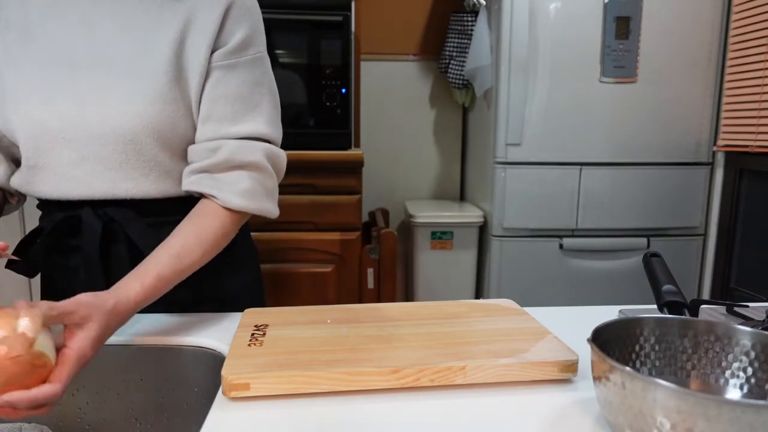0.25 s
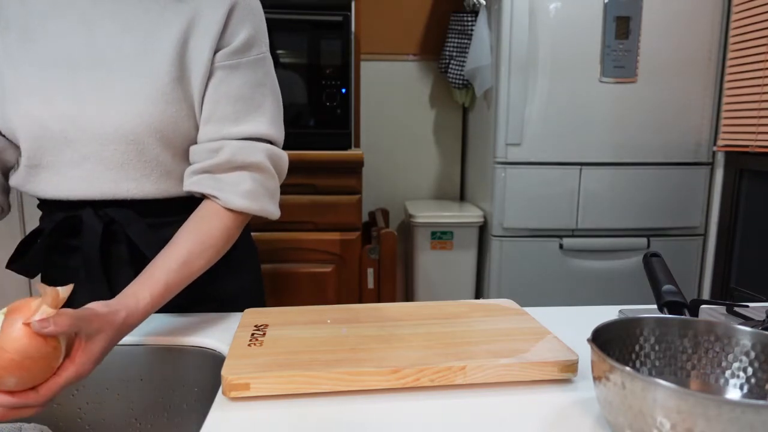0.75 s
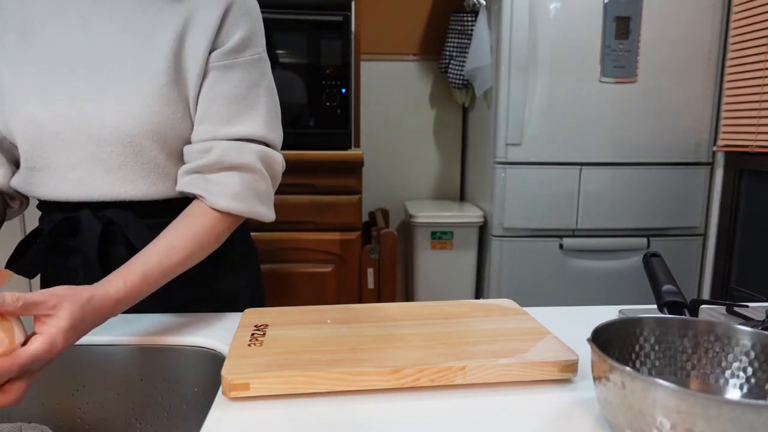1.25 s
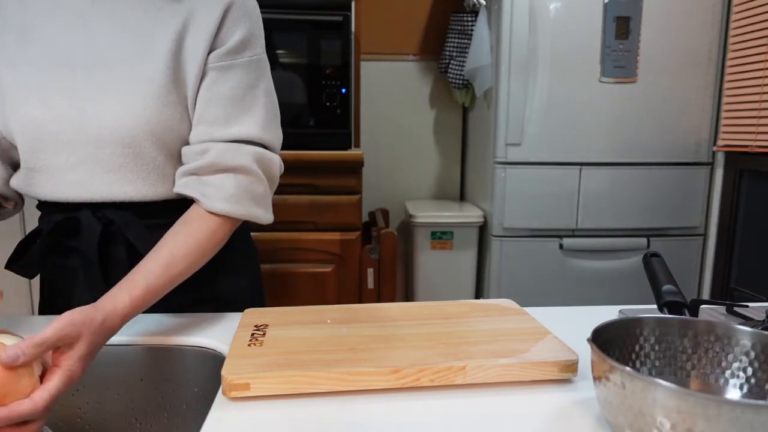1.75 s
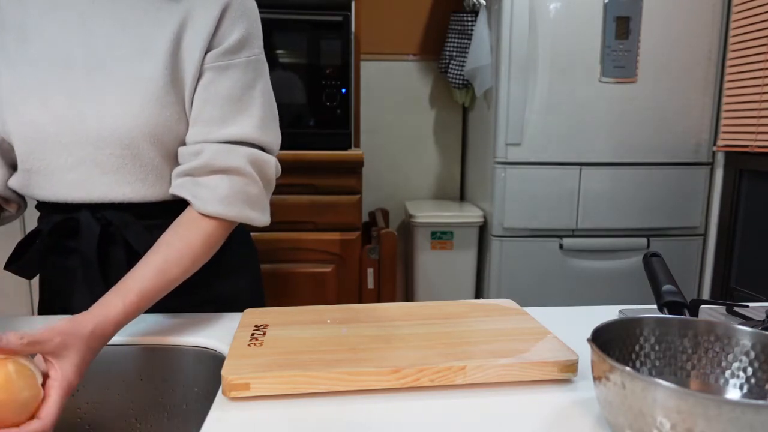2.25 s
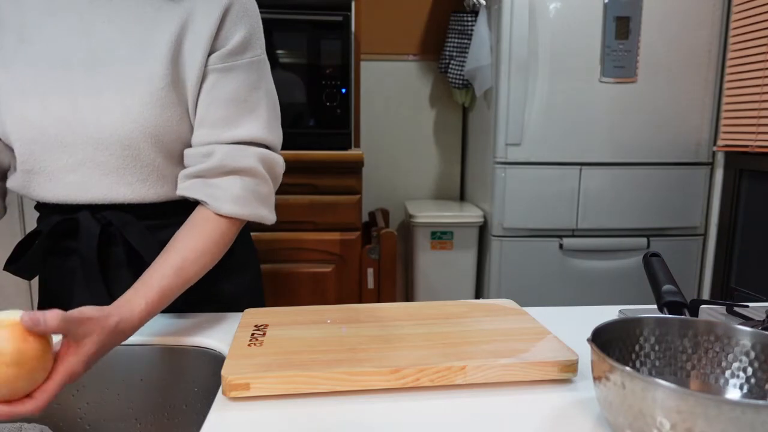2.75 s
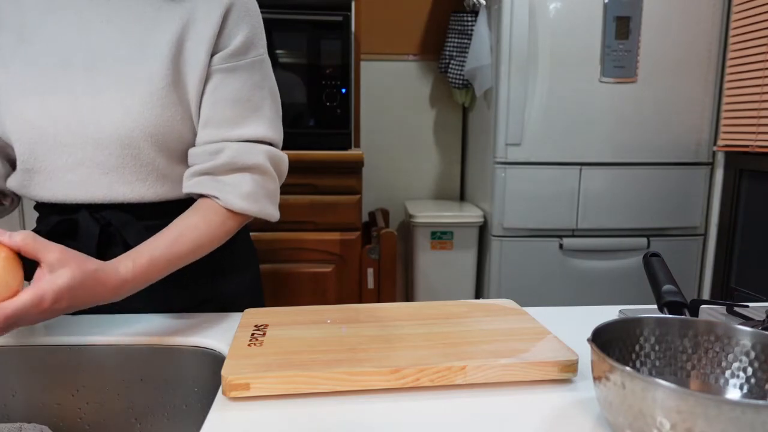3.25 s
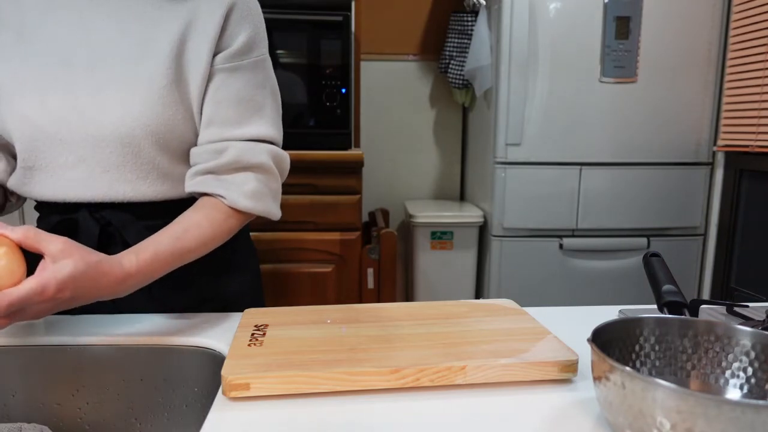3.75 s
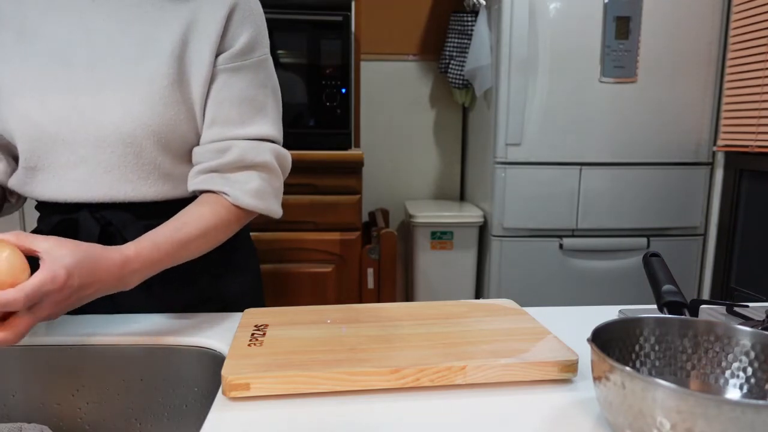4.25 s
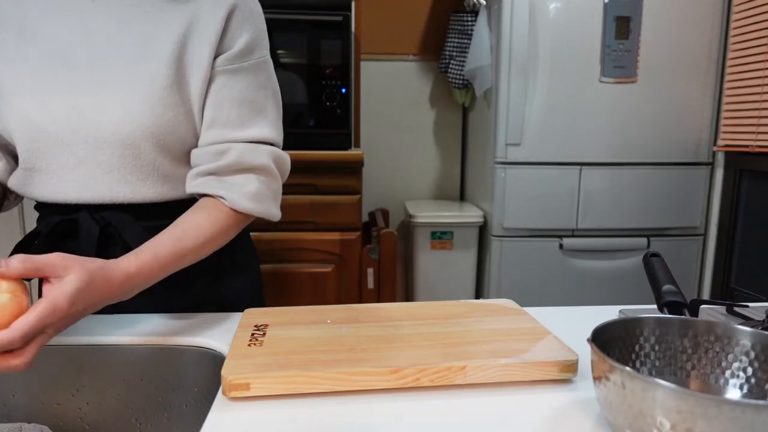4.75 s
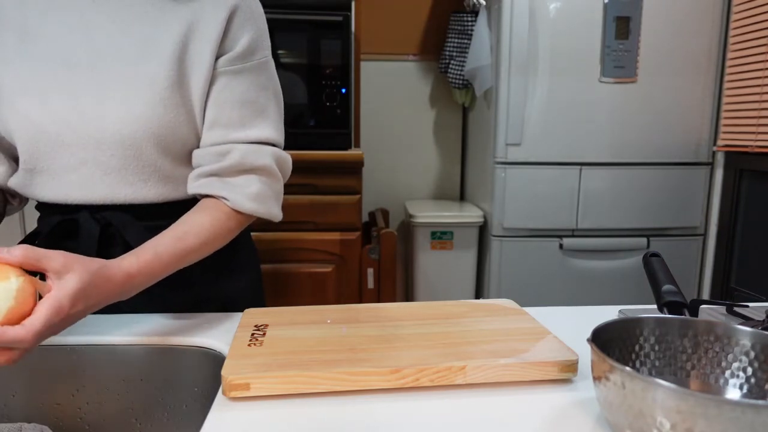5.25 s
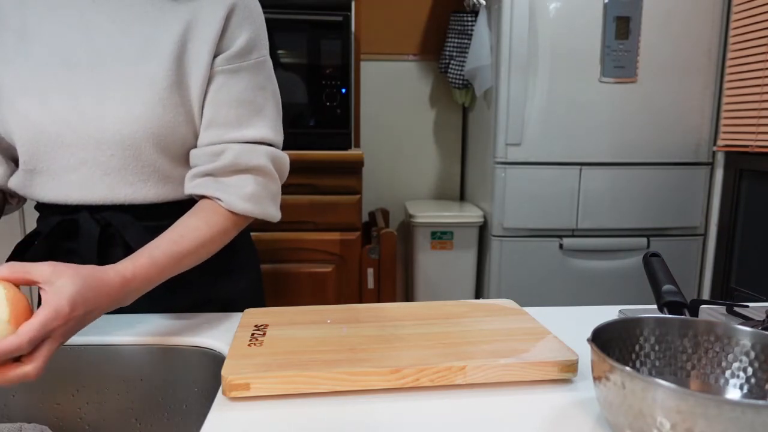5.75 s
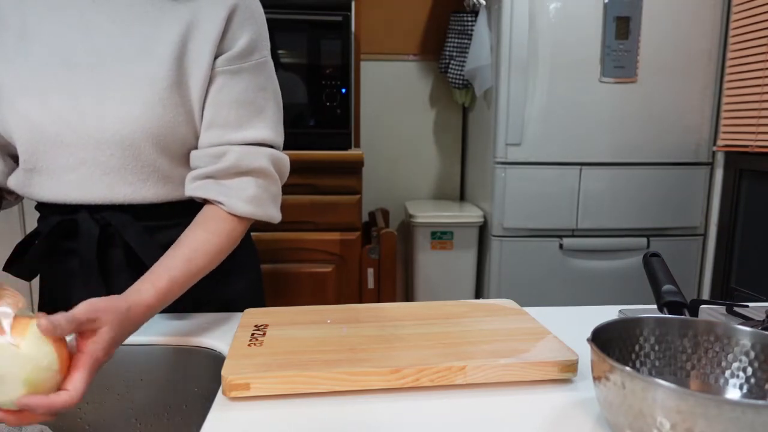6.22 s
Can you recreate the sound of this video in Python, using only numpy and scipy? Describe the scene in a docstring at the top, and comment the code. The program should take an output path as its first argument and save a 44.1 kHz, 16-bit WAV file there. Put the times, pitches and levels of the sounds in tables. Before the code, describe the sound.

Someone peels papery skin off an onion in crisp, crackling bursts, with light blade rubs, soft knocks and a low appliance rumble.

```python
"""Peeling a dry onion

Papery skin is pulled off beside a steel sink in a small kitchen, just left of centre. It tears in
streams of tiny snaps and breaks in sharper cracks, with brief, fuzzy notes among them. A knife blade
rings faintly as it rubs, and fingers knock dully on the onion. A low appliance rumble fills the room,
with a faint whine and a few thin whistles above it."""
import sys
import numpy as np
from scipy import signal
from scipy.io import wavfile
from scipy.ndimage import uniform_filter1d

SR = 44100
rng = np.random.default_rng(int(sys.argv[2]) if len(sys.argv) > 2 else 0)


def unload_audio(sound):
    """Save the sound as a 16-bit wav file, at the path given as the first command line argument."""
    columns = np.transpose(np.atleast_2d(sound))
    # keep every value between -1 and 1, then stretch to whole-number steps
    steps = np.round(np.clip(columns, -1, 1) * 32767)
    wavfile.write(sys.argv[1], SR, steps.astype(np.int16))


N = 285768

# Pulls that tear the skin: full_at_s, rise_s, hold_s, level_db, decay_db_per_s, flap_db, crisp_db
PULLS = [(.001, 0.0013, 0.11, -45, 200, -10.5, 8.5), (0.086, .003, 0.022, -32, 201, -10, 1),
         (.125, 0.046, 0.084, -25.5, 600, -6, 0), (.215, .01, .005, -34.5, 150, -7, -6),
         (0.265, .002, .008, -35, 300, -7.5, -1), (0.276, .006, 0.034, -29, 330, -12.5, -3.5),
         (0.347, .01, 0.017, -45.5, 93, -9, -5.5), (.454, .002, .001, -39, 230, -11.5, -20),
         (0.517, 0.0065, .001, -43, 500, -7, -3), (0.542, .01, .001, -55.5, 106, -20, -8),
         (0.734, .002, .001, -45, 269, -10, 3), (0.709, .03, .01, -61.5, 200, -5, 3),
         (0.844, .05, 0.1, -68.5, 200, -18, -6), (1.031, 0.064, .001, -47, 93, -13.5, -28),
         (1.176, 0.099, .001, -38, 198, -8.5, -17), (1.231, 0.0037, .001, -28.5, 318, -9, -9),
         (1.347, .01, 0.043, -25.5, 288, -10.5, -14.5), (1.461, 0.024, 0.034, -22.5, 263, -12.5, -7.5),
         (1.577, .02, 0.018, -54, 90, -13, -28), (1.835, .23, 0.049, -44, 350, -14.5, -12),
         (2.02, 0.12, .001, -47.5, 500, -15, -15), (2.026, 0.0036, .001, -28.5, 500, -22, -26),
         (2.042, .014, .001, -36.5, 130, -12, -18), (2.109, .005, .001, -27.5, 143, -13, -10),
         (2.194, .005, .003, -29.5, 196.5, -9.5, -7), (2.247, 0.018, 0.014, -27, 300, -5.5, -1),
         (2.287, .03, .005, -30, 140, -9.5, -1.5), (2.371, 0.0073, .001, -25.5, 290, -9, -3),
         (2.436, 0.0091, .001, -26, 348.5, -8.5, -9), (2.516, 0.018, .001, -37, 199, -3, -2),
         (2.653, 0.0044, .001, -40, 236, -15, -4.5), (2.731, 0.033, .001, -37.5, 321.5, -5.5, -5),
         (2.776, .015, .001, -40.5, 264.5, -4, -3.5), (3.827, 0.024, .001, -48.5, 203, -1, 6),
         (3.936, 0.039, .001, -54.5, 150, -3.5, 2), (4.216, 0.17, .001, -40, 87, -8.5, 3.5),
         (4.304, .003, 0.027, -36, 202, -11, 0), (4.347, 0.061, .02, -28, 358, -11, -4),
         (4.436, .01, 0.045, -53, 103, -20, -5), (4.52, 0.029, .001, -44, 275, -1, 5),
         (4.575, .004, .001, -46, 1505, -4, 10), (4.597, .001, .014, -36.5, 196, -20, -1),
         (4.699, 0.065, 0.15, -31, 353, -9, -6), (4.913, .03, 0.19, -58, 497, -7.5, -7.5),
         (5.15, .04, 0.095, -69.5, 195, -12, -4), (5.649, 0.037, 0.083, -29, 300, -23, -10),
         (5.794, .01, .001, -51, 150, -5, 0), (5.864, .002, .005, -52, 298, -5, 17.5),
         (5.9116, 0.00076, 0.0026, -18.5, 1200, -14.5, -5.5), (5.923, .008, .02, -31.5, 298, -4, -7),
         (5.967, 0.049, 0.021, -25.5, 390, -9, -4), (6.056, .01, 0.093, -45.5, 200, -0.5, 0),
         (6.175, 0.026, .001, -38, 324, -2.5, -6), (6.252, .01, .001, -65.5, 28, 1, 0)]
# Tone colour of dry skin: frequency_hz, level_db
SKIN_SPECTRUM = [(240, -30), (400, -36), (598, -37.5), (839, -16.5), (1290, -14), (1990, -7.5),
                 (3210, -3.5), (3690, 1.5), (4510, 1), (4950, 2.5), (10500, 3.5), (15000, -2), (16000, -8)]
# Long rips that free a flap: full_at_s, pitch_at_full_hz, fall_octaves_per_s, level_db
LONG_RIPS = [(.13, 2160, 7, -36), (4.35, 2350, 4.5, -29.5), (4.82, 1480, 5.5, -44),
             (5.674, 2760, 13.4, -31)]
# Sharp breaks in the skin: start_s, level_db, pitch_hz
SKIN_CRACKS = [(.0548, -22, 10200), (0.087, -10.5, 9180), (0.109, -7.5, 9200), (0.1468, -3, 6500),
               (.165, -10, 3680), (.175, -6, 10500), (0.1988, -4, 7100), (.263, -19, 5980),
               (0.279, -5.5, 5650), (.304, -14, 6040), (0.3297, -16.5, 5000), (.415, -27.5, 3650),
               (0.455, -16, 6140), (0.5177, -26, 4470), (0.5748, -33, 4200), (0.601, -30.5, 4330),
               (.737, -25, 6160), (1.0156, -31, 5740), (1.065, -28, 6730), (1.1232, -19.5, 5960),
               (1.1463, -11, 3400), (1.1713, -15.5, 10100), (1.231, -12, 6940), (1.3467, -9.5, 10200),
               (1.353, -12, 5610), (1.455, -6, 3460), (1.4584, -5.5, 3650), (1.504, -6, 5800),
               (1.5752, -22, 4100), (1.713, -27.5, 6760), (1.9877, -28, 4720), (2.027, -10, 6300),
               (2.106, -11, 6700), (2.1961, -12.5, 6200), (2.2469, -11, 4500), (2.268, -17, 6000),
               (2.2905, -6, 6350), (2.328, -11, 10700), (2.375, -8.5, 7200), (2.4375, -12, 8900),
               (2.5145, -18, 6200), (2.5596, -24, 7750), (2.654, -25, 5800), (2.722, -19, 6000),
               (2.7777, -30, 3540), (2.828, -33.5, 8500), (3.4252, -31.5, 8800), (3.669, -44, 11200),
               (3.822, -28, 11500), (3.9327, -36, 11700), (4.0884, -36, 3700), (4.1105, -23.5, 9200),
               (4.1465, -21, 8880), (4.172, -19, 8700), (4.1859, -24, 7600), (4.2163, -24, 6940),
               (4.308, -16.5, 9920), (4.321, -14.5, 3900), (4.4566, -28.5, 8530), (4.4882, -33, 8270),
               (4.5089, -25, 7400), (4.519, -40, 7800), (4.573, -18, 8800), (4.5991, -10, 9600),
               (4.612, -14, 8000), (4.6698, -22, 5300), (4.6818, -25, 5140), (4.9544, -35, 6360),
               (5.055, -30.5, 6300), (5.093, -42, 5120), (5.1577, -41, 3740), (5.2867, -39, 8750),
               (5.308, -37.5, 3760), (5.3258, -36, 8900), (5.3368, -25.5, 8900), (5.3997, -25, 9500),
               (5.4183, -21, 8000), (5.5565, -31, 9200), (5.642, -17, 6580), (5.6488, -14, 6000),
               (5.8097, -36, 5200), (5.8625, -21, 10500), (5.914, -18, 3940), (5.955, -10.5, 4100),
               (6.072, -23, 3340), (6.1389, -26, 8880), (6.169, -19.5, 3740), (6.1757, -19, 6340),
               (6.1834, -17, 10500), (6.3684, -35.5, 11200)]
# Brief, fuzzy ringing notes heard during the tearing: start_s, end_s, pitch_hz, level_db
FUZZY_NOTES = [(.147, .16, 6300, -25), (1.346, 1.425, 3060, -31.5), (1.446, 1.492, 3680, -20),
               (1.752, 1.93, 3730, -44.5), (2.24, 2.3, 4300, -28), (4.106, 4.25, 8700, -44.5),
               (4.316, 4.357, 3830, -29.5), (4.327, 4.398, 7470, -27.5), (4.695, 4.86, 5030, -30),
               (4.699, 4.87, 3900, -39), (5.652, 5.682, 5800, -31), (5.683, 5.753, 7600, -31),
               (5.918, 6.007, 3850, -24), (6.058, 6.19, 3520, -44), (6.056, 6.2, 2470, -48.5)]
# Knife strokes on the onion: full_at_s, rise_s, hold_s, level_db, decay_db_per_s, tilt_db_per_octave
KNIFE_STROKES = [(3.246, 0.037, .001, -48.5, 595, -3), (3.275, 0.021, .14, -60.5, 197.5, 8),
                 (3.427, 0.021, .001, -44, 236, 5.5), (3.687, 0.017, .001, -48, 365, -2.5),
                 (3.828, 0.017, 0.00094, -40, 292, -3), (3.93, 0.032, .04, -56, 398, 1),
                 (4.11, .01, 0.1, -41.5, 202, 0), (5.346, .075, .001, -40, 318, -2),
                 (5.429, 0.05, .001, -26.5, 320, -1.5), (5.56, 0.066, .001, -46.5, 400, 2.5),
                 (5.592, .01, .02, -54, 400, 5)]
# Modes of the steel blade: pitch_hz, width_hz, level_db
BLADE_MODES = [(785, 45, -17), (1215, 50, -14), (1740, 60, -18), (3000, 110, -6), (3750, 45, -5),
               (4990, 40, -6), (5650, 60, -9), (6650, 130, -5), (7840, 55, -2), (8110, 70, -7),
               (8850, 60, -2), (9300, 85, -6), (10000, 75, -5), (10450, 50, -6), (11450, 90, -2),
               (11900, 55, -3), (12700, 40, -5), (13450, 80, -4), (14100, 50, -8), (15100, 50, -8),
               (15600, 40, -9)]
# Finger knocks and presses: start_s, level_db, pitch_hz, t60_s
FINGER_KNOCKS = [(.15, -40, 830, 0.17), (1.345, -54, 1750, 0.18), (1.71, -44, 1970, 0.053),
                 (2.25, -46, 432, 0.32), (2.39, -46.5, 413, 0.26), (4.785, -37.5, 720, 0.092),
                 (5.913, -30.5, 834, 0.1), (5.95, -44.5, 400, 0.42), (5.975, -37.5, 780, 0.26),
                 (6.13, -43.5, 860, 0.59)]
# Reverb time of the kitchen: frequency_hz, t60_s
ROOM_DECAY = [(300, 0.49), (1500, 0.27), (4000, 0.18), (9000, 0.074), (16000, 0.14)]
# Stereo likeness of the reverb: frequency_hz, correlation
ROOM_LIKENESS = [(500, 0.52), (3000, 0.46), (8000, 0.17), (15000, 0.23)]
# Faint whistles: full_at_s, rise_s, hold_s, level_db, decay_db_per_s
WHISTLE_SWELLS = [(3.229, .15, 0.023, -68, 39), (6.294, .02, .07, -72, 899.5),
                  (6.397, .015, .001, -65.5, 60)]
# Tone colour of the appliance rumble: frequency_hz, level_db
RUMBLE_SPECTRUM = [(30, -38.5), (58, -30), (80, -11.5), (125, -10.5), (177, -2.5), (291, -6.5), (386, -14),
                   (491, -20), (624, -24.5), (690, -15.5), (843, -20), (931, -19.5), (1260, -27),
                   (1510, -23), (2440, -31.5), (5200, -36), (16000, -41.5)]
# Stereo likeness of the rumble: frequency_hz, correlation
RUMBLE_LIKENESS = [(60, .98), (180, .97), (400, .88), (800, .6), (1650, .3), (5000, .25), (15000, .4)]


def tears():
    """A dense stream of tiny snaps rings the skin, swelling with each pull of the hand."""
    power = np.zeros((3, N))
    for *pull, decay, flap_db, crisp_db in PULLS:
        # Flap, middle and crisp top; the top fades soonest.
        for band, band_db, faster in zip(power, (flap_db, 0, crisp_db), (1, 1, 1.18)):
            start, _, gain = stroke(*pull, decay * faster)
            add(band, start, (gain * gain_of(band_db)) ** 2)
    stream = snaps(N, per_s=14000, spread_db=3, clump_db=1.65)
    return (np.sqrt(power) * skin_bands(patchy(stream, depth_db=2.89))).sum(0)


def skin_bands(drive):
    """The skin's short ring, as three bands that add in phase: low flap, middle and crisp top."""
    hz = abs(np.fft.fftfreq(1024, 1 / SR))
    log_gain = np.log(gain_of(curve_at(SKIN_SPECTRUM, hz)) + 1e-4)
    response = np.exp(np.conj(signal.hilbert(log_gain)))  # minimum phase keeps the attack sharp
    flap, crisp = 1 / (1 + (hz / 3300) ** 6), 1 / (1 + (9000 / (hz + 1)) ** 6)
    bands, lead = [], 16
    for share in (flap, 1 - flap - crisp, crisp):
        ring = np.roll(np.fft.ifft(response * share).real, lead)[:300]
        bands.append(signal.oaconvolve(drive, ring / np.linalg.norm(ring))[lead:lead + len(drive)])
    return np.array(bands)


def rips():
    """In a long rip the freed flap grows, so its note slides down."""
    out = np.zeros(N)
    for full_at, pitch_hz, fall, db in LONG_RIPS:
        start, t, gain = stroke(full_at, rise_s=.05, hold_s=.024, db=db, decay_db_per_s=325.5)
        hz = pitch_hz * 2 ** (-fall * t)
        drive = snaps(len(t), per_s=12000, spread_db=-5.5, clump_db=3.5)
        add(out, start, gain * resonate(ring_mode(drive, hz, 670), hz, 1200))
    return out


def cracks():
    """A hard break and a fast-dying burst of snaps ring the skin and the patch that gives way."""
    out, t = np.zeros(N), np.arange(4000) / SR
    t60_s, bite_s = .037, .0045
    envelope = gain_of(-60 * t / t60_s) + 1.1 * np.exp(-t / bite_s)
    hard_break = gain_of(13.5) * (t == 0)
    for start, db, hz in SKIN_CRACKS:
        drive = (hard_break + snaps(len(t), per_s=14000, spread_db=0, clump_db=-3)) * envelope
        patch = resonate(ring_mode(drive, hz, 930), hz, 2780)
        octaves_up = np.log2(hz / 6460)  # bright cracks have less flap and more top
        balance = gain_of([-21.5 - 3 * octaves_up, 0, -8 + 9 * octaves_up])
        crack = balance @ skin_bands(drive) + gain_of(5.5) * patch
        add(out, start, gain_of(db - 12.5) * crack / np.std(crack[:130]))  # the first 3 ms set the level
    return out


def fuzzy_notes():
    """Snaps ring one broad resonance: a brief, fuzzy note that swells and fades during the tearing."""
    out = np.zeros(N)
    for start, end, hz, db in FUZZY_NOTES:
        count, width_hz = round((end - start) * SR), .0766 * hz
        drive = snaps(count, per_s=16000, spread_db=5.5, clump_db=-1) * signal.windows.tukey(count, .5)
        add(out, start, gain_of(db) * resonate(ring_mode(drive, hz, width_hz), hz, 2 * width_hz))
    return out


def knife_blade():
    """Fine friction rings the steel over a thin scrape; each mode comes and goes as the edge turns."""
    out, step = np.zeros(N), 400
    for *rub, tilt_db in KNIFE_STROKES:
        start, t, gain = stroke(*rub)
        friction = snaps(len(t), per_s=9000, spread_db=2, clump_db=1.5) * gain
        drift = rng.standard_normal((len(BLADE_MODES), len(t) // step + 1))
        drift = unit_rms(uniform_filter1d(drift, size=5, axis=1))
        contacts = np.repeat(gain_of(4 * drift), step, axis=1)[:, :len(t)]
        steel = sum(gain_of(db + tilt_db * np.log2(hz / 5000)) * ring_mode(friction * contact, hz, width)
                    for (hz, width, db), contact in zip(BLADE_MODES, contacts))
        add(out, start, gain_of(-10) * steel + gain_of(-4) * low_cut(friction, hz=3000))
    return out


def finger_knocks():
    """A short scuffed push rings one low, damped mode of the onion."""
    out, t = np.zeros(N), np.arange(8000) / SR
    for start, db, hz, t60 in FINGER_KNOCKS:
        push = rng.standard_normal(len(t)) * gain_of(db - 60 * t / t60)
        add(out, start, resonate(ring_mode(push, hz, 220), hz, 400))
    return out


def sink_scatter(close, turns_per_s=6):
    """Counter and sink walls scatter the treble along paths that change as the hands move."""
    paths = np.diff(rng.standard_normal((2, 900)) * np.exp(-np.arange(900) / 250))
    motion = unit_rms(uniform_filter1d(rng.standard_normal(N), size=4000))
    angle = 2 * np.pi * turns_per_s * np.cumsum(motion) / SR
    sends = close * np.array([np.cos(angle), np.sin(angle)])
    return signal.oaconvolve(sends, paths / np.linalg.norm(paths[0]), axes=1)[:, :N].sum(0)


def kitchen_reverb(close):
    """Sparse echoes of random sign, partly shared by both sides; each band dies at its own speed."""
    count, spacing = SR // 2, 20
    taps = np.zeros((2, count))
    slots = np.arange(60, count - spacing, spacing)
    arrivals = slots + rng.integers(0, spacing, (2, len(slots)))
    np.put_along_axis(taps, arrivals, rng.choice([-1., 1.], arrivals.shape), 1)
    hz, t, spectra = signal.stft(taps, SR, nperseg=128)
    decay = gain_of(-60 * t / curve_at(ROOM_DECAY, hz)[:, None])
    tail = signal.istft(stereo_pair(*spectra, ROOM_LIKENESS, hz) * decay, SR, nperseg=128)[1]
    return signal.fftconvolve(close[None], tail / np.linalg.norm(tail[0]), axes=1)[:, :N]


def whine_and_whistles():
    """Narrow bands of noise: one steady, fuzzy whine and a few brief, wavering whistles."""
    out = gain_of(-79) * unit_rms(resonate(rng.standard_normal(N), hz=5050, width_hz=50))
    for swell in WHISTLE_SWELLS:
        start, t, gain = stroke(*swell)
        add(out, start, gain * unit_rms(resonate(rng.standard_normal(len(t)), hz=3130, width_hz=110)))
    return out


def appliance_rumble():
    """A steady bed of low noise, nearly mono in the bass, with faint drifting patches of colour."""
    frames, hz = N // 512 + 5, np.fft.rfftfreq(2048, 1 / SR)
    left_re, left_im, other_re, other_im, patches = rng.standard_normal((frames, len(hz), 5)).T
    patches = uniform_filter1d(patches, size=12, axis=0)
    patches = unit_rms(uniform_filter1d(patches, size=8, axis=1))
    spectra = stereo_pair(left_re + 1j * left_im, other_re + 1j * other_im, RUMBLE_LIKENESS, hz)
    spectra *= gain_of(curve_at(RUMBLE_SPECTRUM, hz)[:, None] + 1.97 * patches)
    return gain_of(-56.5) * unit_rms(signal.istft(spectra, nperseg=2048, noverlap=1536)[1][:, :N])


def snaps(count, per_s, spread_db, clump_db):
    """Clicks of random sign and size that come in clumps a few milliseconds long."""
    chance, sign, clumps = rng.random(count), rng.random(count), rng.standard_normal(count)
    clumps = unit_rms(uniform_filter1d(uniform_filter1d(clumps, size=120), size=120))
    size_db = spread_db * -np.log(rng.random(count) * .95 + .05) + clump_db * np.clip(clumps, -2, 2)
    return unit_rms((chance < per_s / SR) * np.sign(sign - .5) * gain_of(size_db))


def stroke(full_at_s, rise_s, hold_s, db, decay_db_per_s):
    """A rise, hold and decay envelope; returns its start, time from full strength and gain."""
    climb_db, fall_db, rise_s = 20, 45, max(rise_s, .001)
    t = np.arange(-min(rise_s, full_at_s), hold_s + fall_db / decay_db_per_s, 1 / SR)
    shape_db = climb_db * np.minimum(t, 0) / rise_s - decay_db_per_s * np.maximum(t - hold_s, 0)
    fade_in = np.minimum((t - t[0]) / (.28 * rise_s), 1)
    return full_at_s + t[0], t, gain_of(db + shape_db) * fade_in


def patchy(x, depth_db):
    """Uneven resonance: random patches a few hundred hertz wide, lasting tens of milliseconds."""
    spectra = signal.stft(x, nperseg=512, noverlap=384)[2]
    patches = rng.standard_normal(spectra.shape[::-1]).T
    for axis, size in ((0, 3), (1, 12), (1, 6)):
        patches = uniform_filter1d(patches, size=size, axis=axis)
    spectra *= gain_of(depth_db * unit_rms(patches))
    return signal.istft(spectra, nperseg=512, noverlap=384)[1][:len(x)]


def resonate(x, hz, width_hz):
    """A unity-gain resonance that can glide: shift the pitch down to zero, smooth, shift back."""
    carrier = np.exp(2j * np.pi * np.cumsum(hz * np.ones(len(x))) / SR)
    pole = np.exp(-np.pi * width_hz / SR)
    return 2 * (carrier * signal.lfilter([1 - pole], [1, -pole], x / carrier + 1e-18)).real


def ring_mode(drive, hz, width_hz):
    """A resonance that keeps the energy of white clicks."""
    return resonate(drive, hz, width_hz) * np.sqrt(SR / (2 * np.pi * width_hz))


def stereo_pair(left, other, likeness, hz):
    """Left and right spectra from two independent ones, as alike as the table asks."""
    shared = np.clip(curve_at(likeness, hz), 0, 1)[:, None]
    return np.array([left, shared * left + np.sqrt(1 - shared ** 2) * other])


def low_cut(x, hz):
    """A high-pass of 12 dB per octave."""
    return signal.sosfilt(signal.butter(2, hz, "high", fs=SR, output="sos"), x)


def curve_at(points, hz):
    """A table's values along a log frequency axis."""
    points_hz, values = np.transpose(points)
    return np.interp(np.log(hz + 1), np.log(points_hz + 1), values)


def gain_of(db):
    """Decibels to a factor."""
    return 10 ** (np.asarray(db) / 20)


def unit_rms(x):
    """Scales to rms 1."""
    return x / np.sqrt(np.mean(x ** 2) + 1e-20)


def add(track, start_s, sound):
    """Lays a sound into a track."""
    part = track[round(start_s * SR):][:len(sound)]
    part += sound[:len(part)]


def scene():
    """Onion, knife and fingers up close in the kitchen, over the background bed."""
    peeling = low_cut(tears() + rips() + cracks(), hz=550)  # the peeling carries almost no bass
    close = peeling + fuzzy_notes() + knife_blade() + finger_knocks()
    sides = np.outer([1, -1], sink_scatter(close))
    action = gain_of(-4.5) * close + gain_of(-12.5) * sides + gain_of(-11) * kitchen_reverb(close)
    lean_left = gain_of([[.5], [-.5]])
    return lean_left * action + whine_and_whistles() + appliance_rumble()


def record(dry):
    """Final EQ: rolls off the deepest bass and cuts the extreme top."""
    high_cut = signal.firwin(511, 15800, window=("kaiser", 9), fs=SR)
    return signal.oaconvolve(low_cut(dry, hz=60), high_cut[None], "same")


dry = scene()
out = record(dry)
unload_audio(out)
```